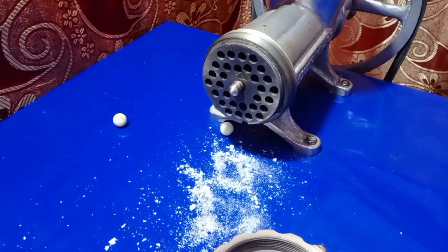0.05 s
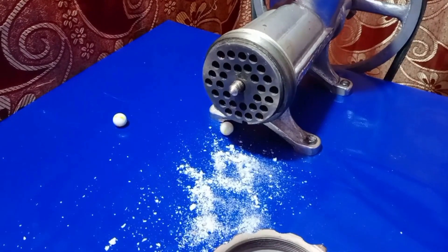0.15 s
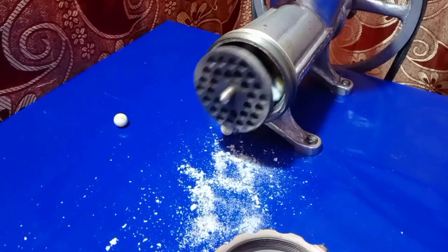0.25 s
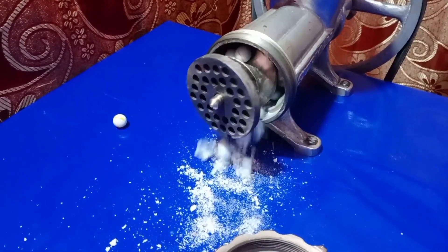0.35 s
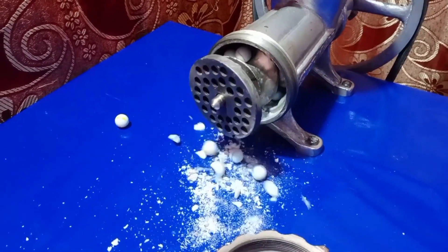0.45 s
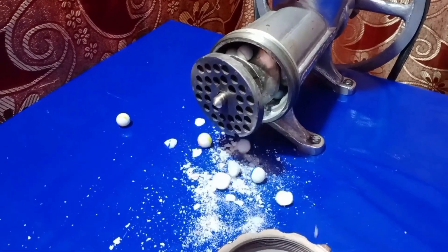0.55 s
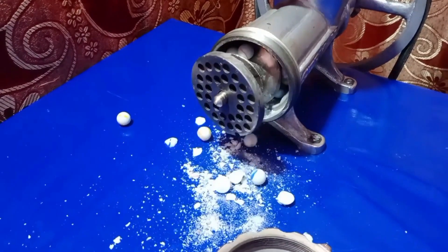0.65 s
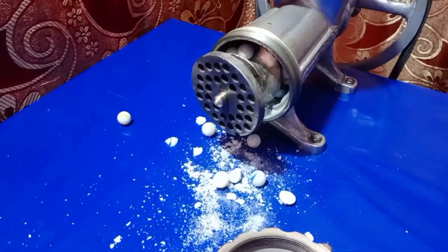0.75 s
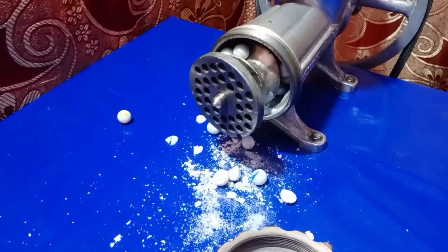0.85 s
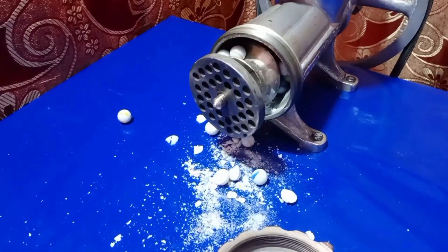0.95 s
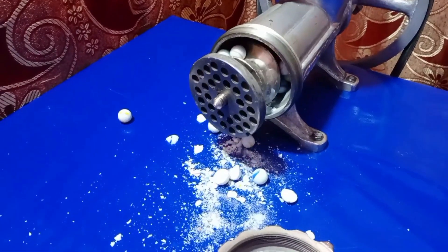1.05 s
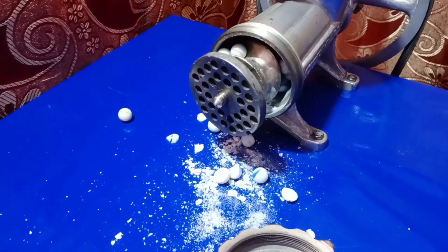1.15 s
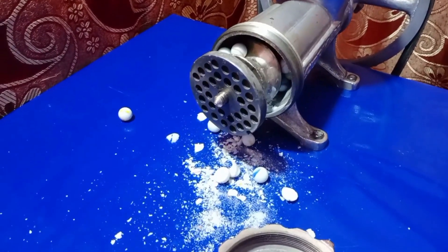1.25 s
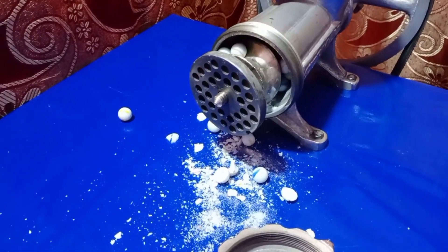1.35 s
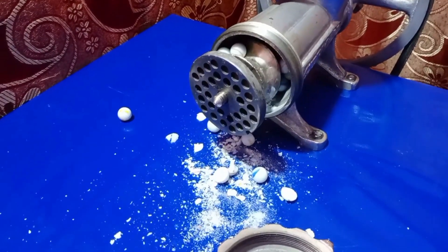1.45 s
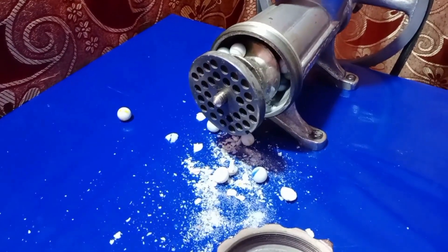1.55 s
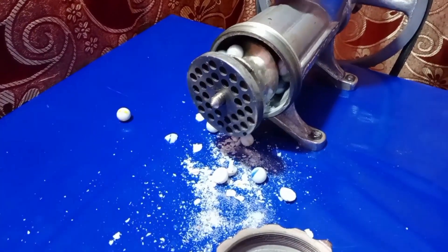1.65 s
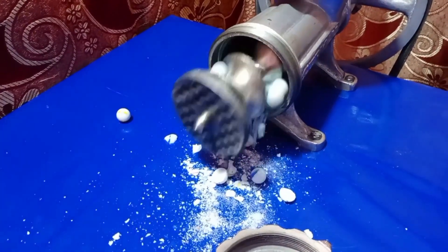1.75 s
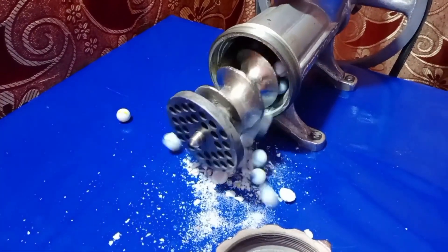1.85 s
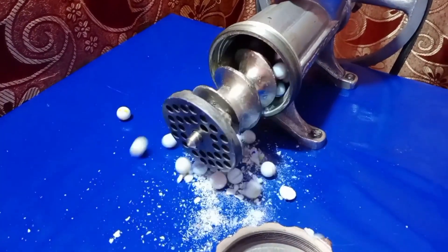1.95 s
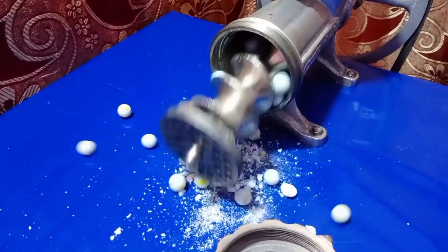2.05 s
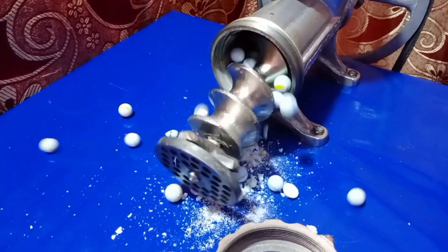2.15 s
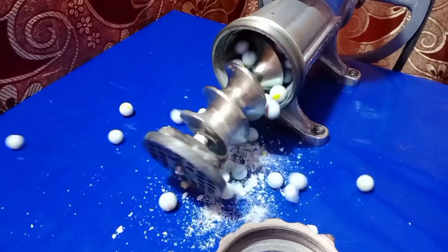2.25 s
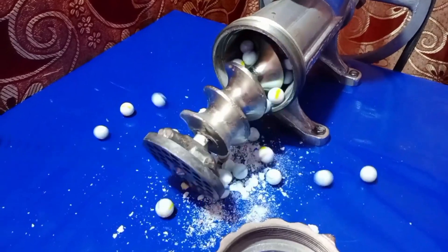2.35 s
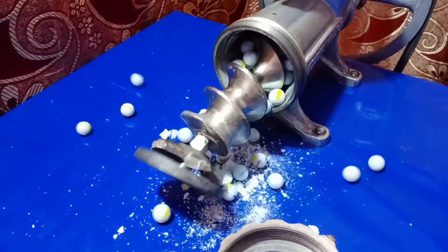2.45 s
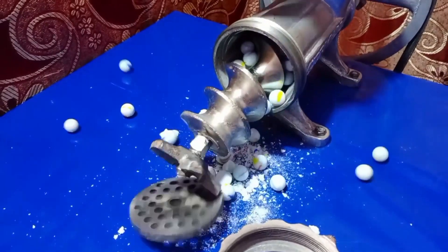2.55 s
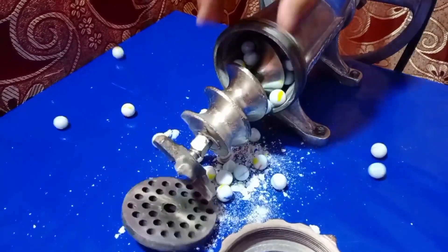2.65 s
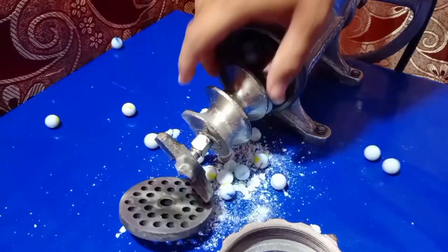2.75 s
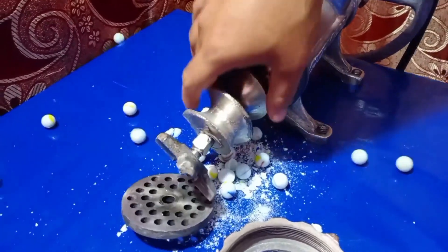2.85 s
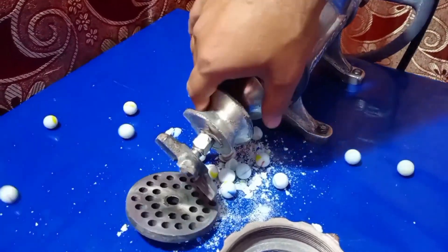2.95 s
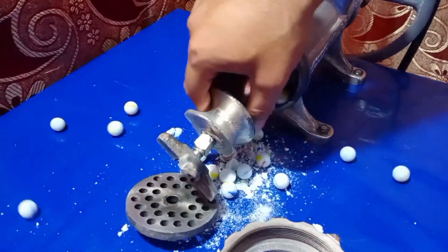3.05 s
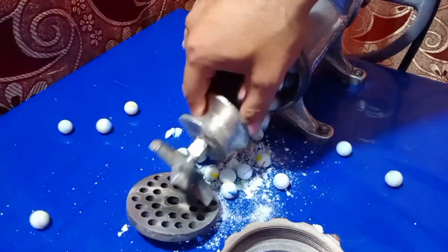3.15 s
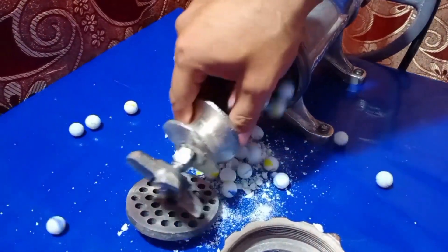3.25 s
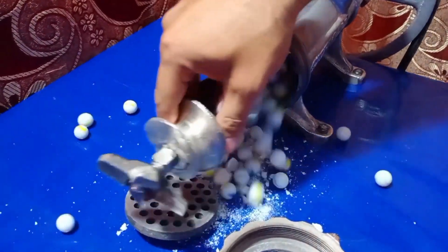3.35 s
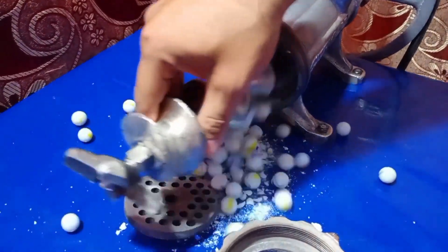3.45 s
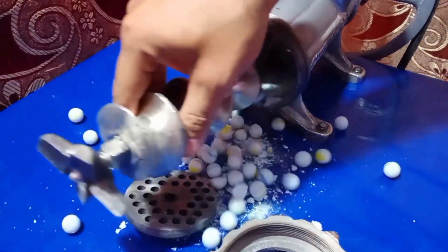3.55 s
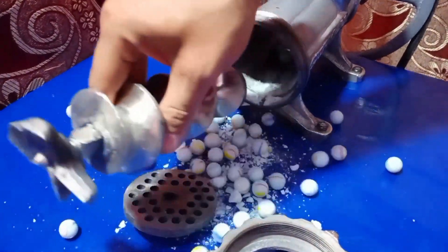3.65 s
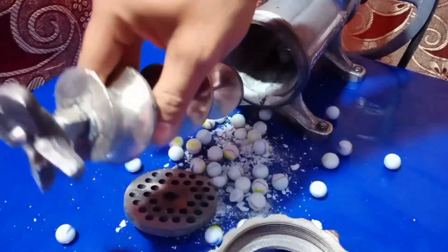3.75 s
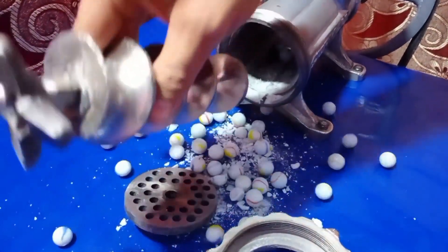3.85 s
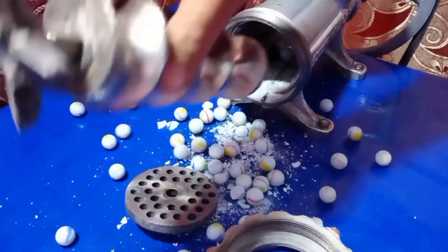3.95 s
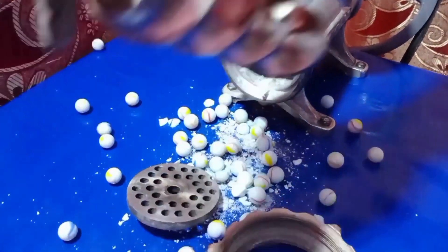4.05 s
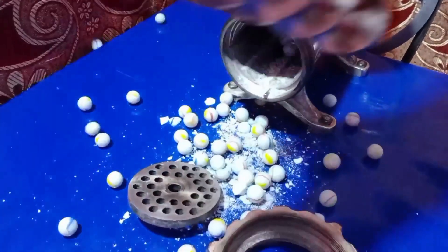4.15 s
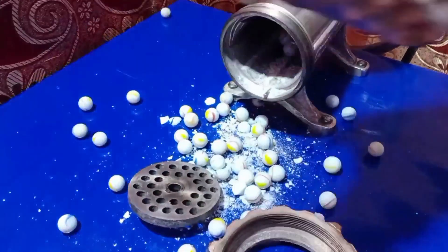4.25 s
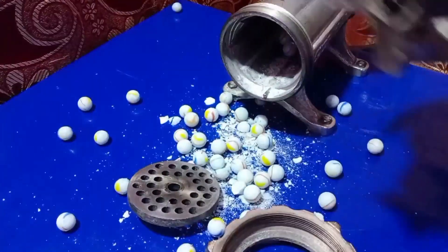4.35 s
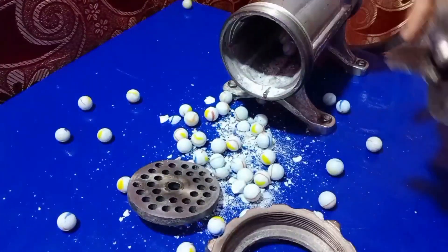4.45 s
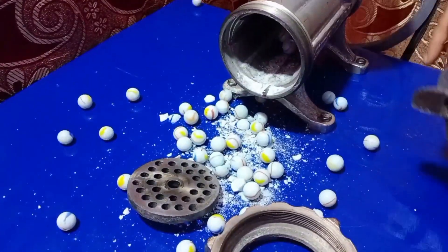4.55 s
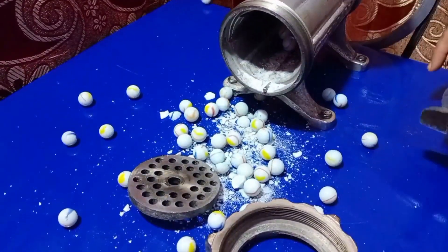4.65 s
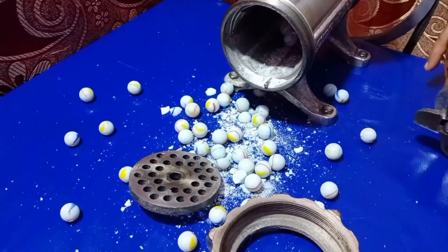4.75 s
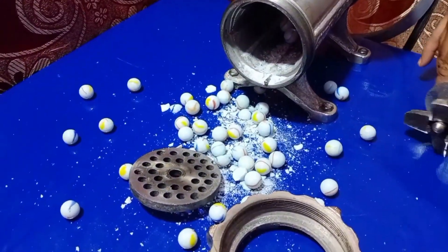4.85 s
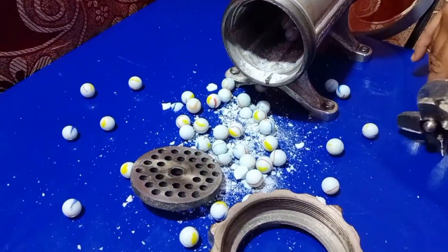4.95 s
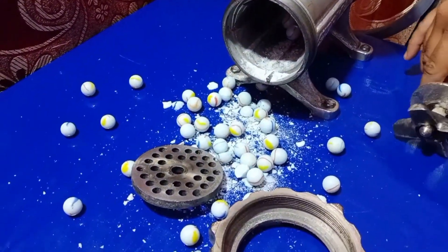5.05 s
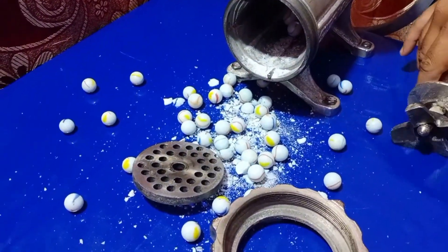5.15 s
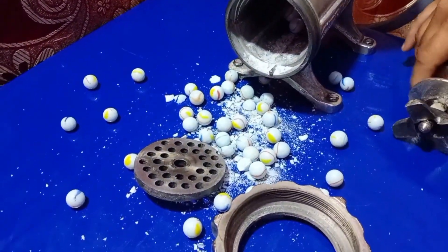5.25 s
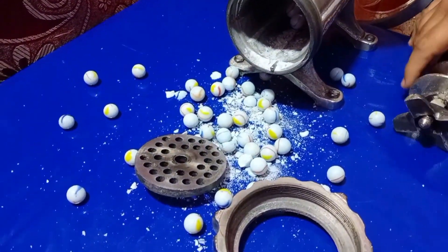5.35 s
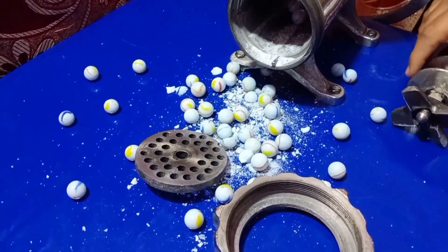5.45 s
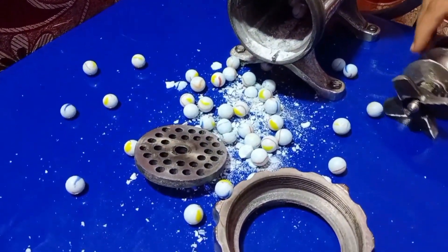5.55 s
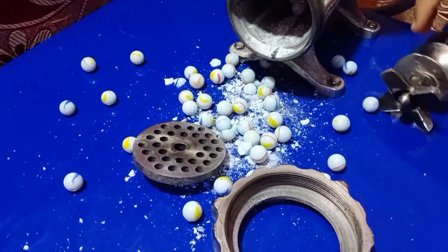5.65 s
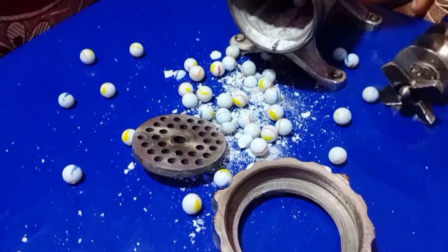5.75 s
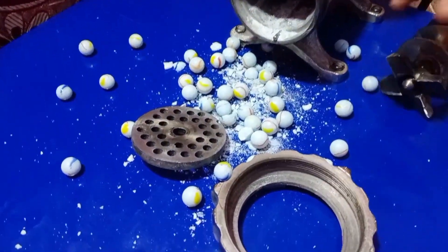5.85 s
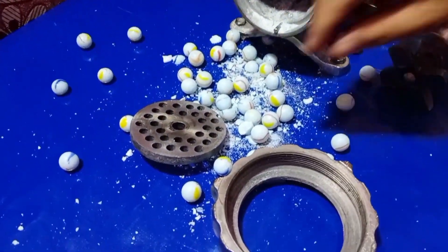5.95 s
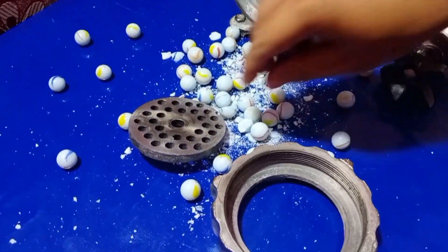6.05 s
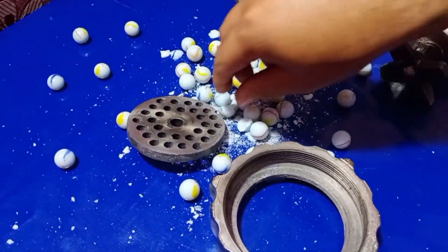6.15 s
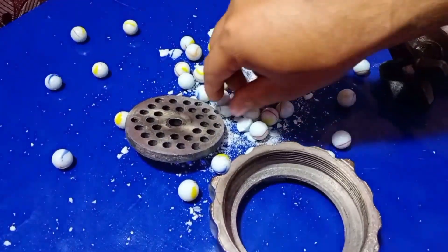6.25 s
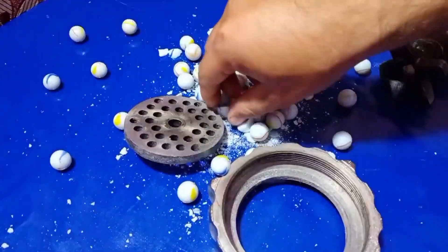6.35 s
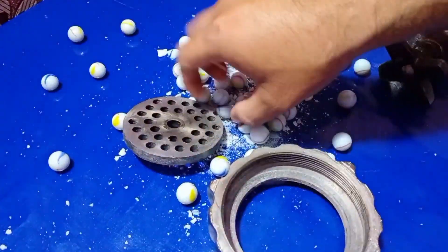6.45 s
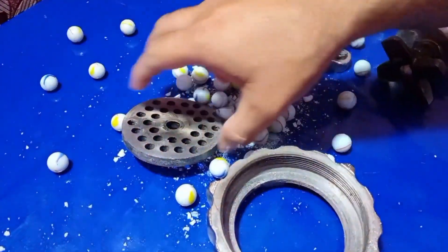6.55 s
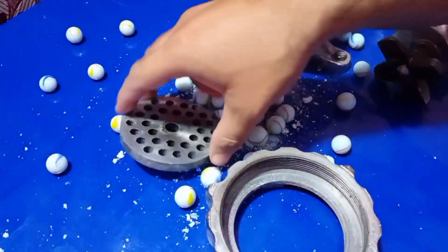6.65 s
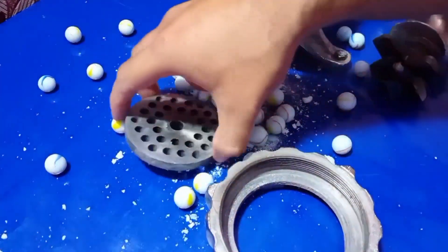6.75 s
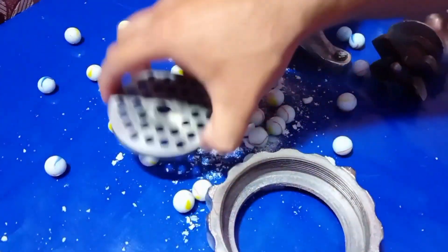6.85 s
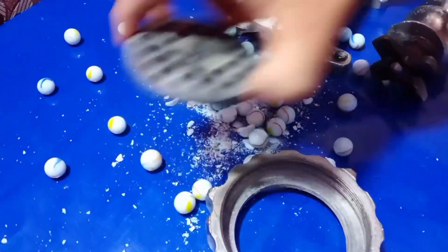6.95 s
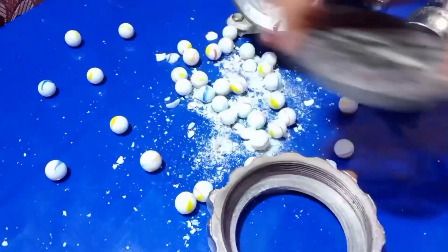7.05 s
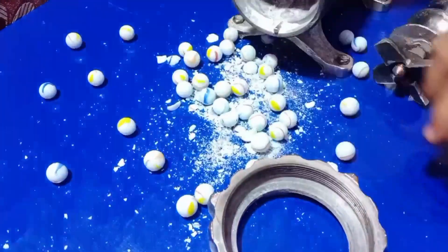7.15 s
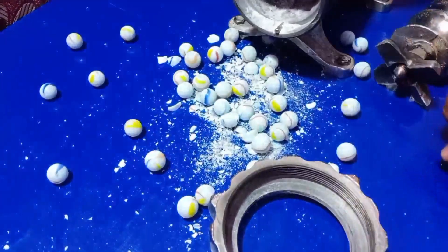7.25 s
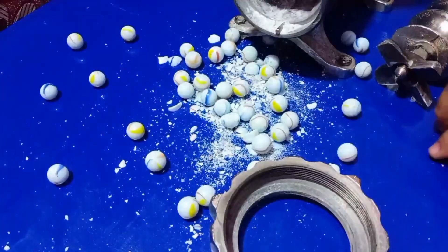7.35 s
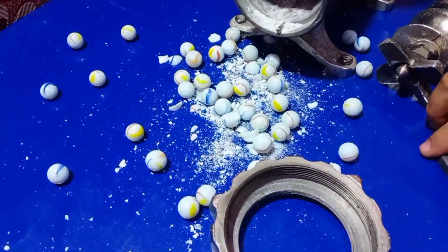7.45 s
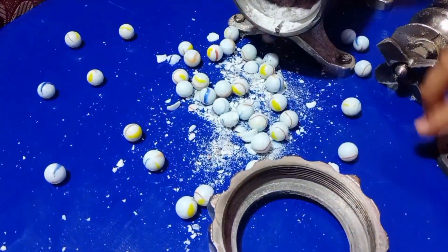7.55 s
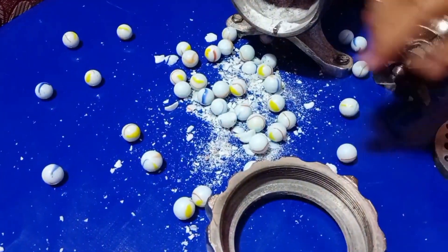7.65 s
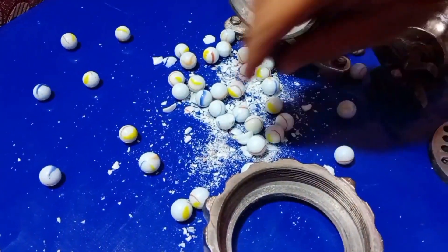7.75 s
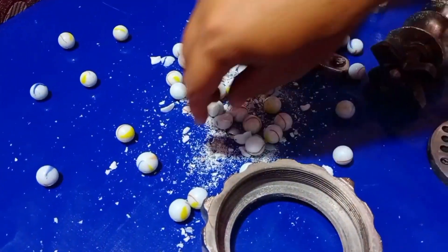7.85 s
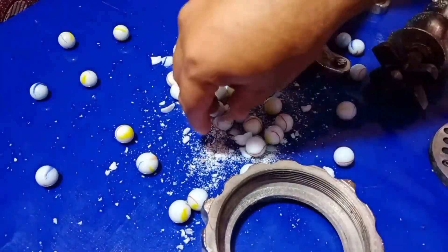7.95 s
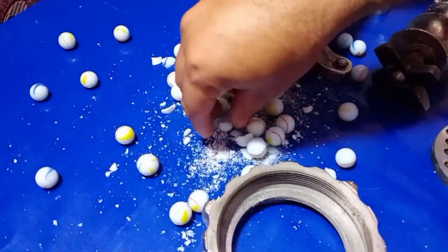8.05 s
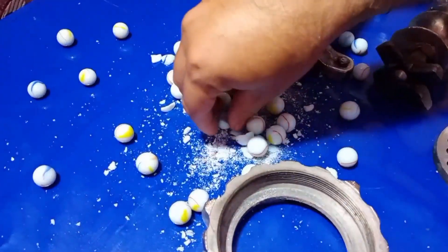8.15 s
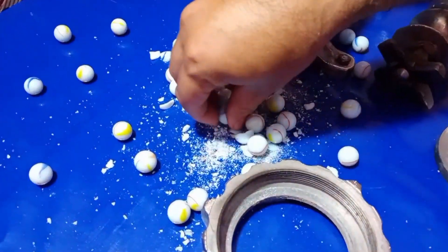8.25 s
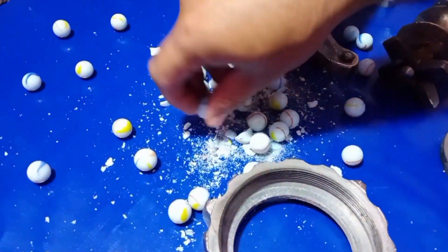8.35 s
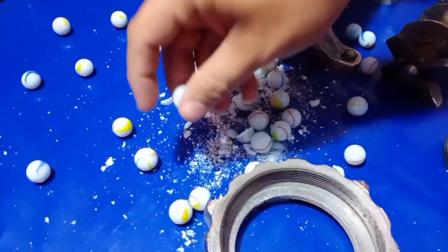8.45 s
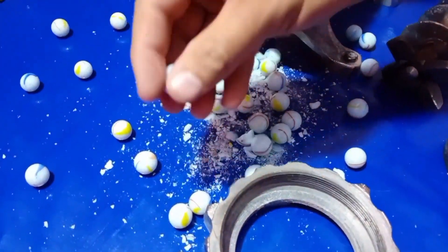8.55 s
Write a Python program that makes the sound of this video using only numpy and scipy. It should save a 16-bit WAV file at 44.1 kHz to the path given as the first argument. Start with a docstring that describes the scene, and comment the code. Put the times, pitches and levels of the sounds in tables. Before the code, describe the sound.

In a bare, echoing room, close up, two faint ticks open. From 0.35 s marbles knock out of a steel grinder onto a thin table, with sharp clacks and a thin high plate ring near 0.45 s, then scattered bounces until 1.4 s. After a short lull, a dense, loud spill runs from 1.8 to 2.8 s: glass clacks, board knocks, bright ticks, ringing steel plate and knife. It thins briefly around 3 s, then clatters again from 3.25 to 3.9 s. Isolated hard marble bounces ring out at about 3.9, 4.5, 4.65 and 5.1 s, with a low thud at 5 s as a part is set down. Small rattles and soft table bumps fade by 6.2 s. Faint rolling and a gently scraped plate follow around 6.8 s, dull set-down thuds at 7.6 and 7.7 s, then tiny clicks of fingers in marbles from 8.15 s to the end.

```python
"""Bare, echoing room: glass marbles and the steel parts of a hand grinder spill onto a thin table top.
Each contact is a short burst: board thump and knock, a clack of glass on metal, a bright tick, a brief clink.
Struck loose steel plate and knife ring on as decaying sines; bouts of random contacts make the rattle.
Later parts are set down with thuds and low hums, marbles roll in narrow board modes, fingers stir the heap.
Noise suppression patches the faint floor and ends tails early; a limiter holds the peaks down."""
import sys
import numpy as np
from scipy import signal
from scipy.fft import rfft, irfft
from scipy.io import wavfile
from scipy.ndimage import uniform_filter1d, minimum_filter1d

SR = 44100
rng = np.random.default_rng(int(sys.argv[2]) if len(sys.argv) > 2 else 0)


def master(y):
    """Save y as 16-bit WAV."""
    cut = np.clip(np.atleast_2d(y).T, -1, 1)
    pcm = np.round(cut * 32767)  # scale
    wavfile.write(sys.argv[1], SR, pcm.astype(np.int16))


N = 379250

# Single contacts. Each row: start in seconds, clack in dB, board in dB re clack, pitch of the struck
# board spot in Hz, tick in dB re clack, clink pitch in Hz, distance in hand spans.
HITS = [(0.063, -44, -29, 1420, -3, 2150, 1.9), (0.099, -37.5, -18.5, 1530, -12, 2710, 3.1),
        (0.332, -42.5, -8, 790, -12.5, 2800, 5.6), (.343, -27, -6.5, 783, -17, 2235, 8.8),
        (.361, -20, -15, 377, -13, 2390, 13), (0.382, -10.5, -9.5, 343, -11.5, 3130, 8.1),
        (.413, -13, -15, 1497, -7, 3100, 6.3), (.518, -25.5, -4, 1030, -21.5, 2600, 2),
        (.547, -23.5, -2.5, 1030, -19, 1790, 2.6), (.613, -25.5, -5.5, 983, -16, 4600, 2.2),
        (.653, -22, -8, 1030, -32, 1996, 3.4), (0.697, -17, -34, 1030, -10, 3160, 5),
        (0.715, -32, -26.5, 1360, -10, 2590, 2.5), (.848, -23.5, -14.5, 374, -14, 3140, 4.6),
        (.888, -30, -14, 376, -26, 2600, 2.9), (.954, -24, -22.5, 1440, -29, 2460, 8.7),
        (.968, -20.5, -13, 384, -12.5, 3040, 7), (1.032, -28, -8, 432, -18, 2540, 8.9),
        (1.057, -19.5, -19.5, 364.3, -7.5, 2400, 3.6), (1.141, -32.5, -35, 380, -9, 3120, 2.8),
        (1.174, -21.5, -24.5, 1370, -6, 2990, 3.5), (1.324, -24.5, -26.5, 1390, -8.5, 2460, 5.6),
        (1.395, -23, -25, 380, -7, 2430, 1.8), (1.765, -43, -16, 706, -14, 2420, 5.1),
        (1.798, -23.5, -10, 450, -15, 2330, 6.5), (1.82, -15, -16, 353, -10.5, 3150, 5.9),
        (1.854, -19, -13.5, 378, -23, 2564, 3.0), (1.874, -16, -10.5, 357, -12, 3100, 7.2),
        (1.931, -13, -15.5, 1440, -27.5, 2330, 2.4), (1.963, -18, -12.5, 1377, -5.5, 3120, 5),
        (1.998, -14.5, -11.5, 1485, -23, 3170, 2.3), (2.112, -26.5, -19, 1500, -14, 2510, 0.96),
        (2.138, -17, -20.5, 417, -10, 2360, 5.8), (2.218, -15, -13.5, 1330, -14.5, 2570, 4.3),
        (2.238, -17, -6.5, 1420, -26, 2490, 1.9), (2.28, -15, -8, 383, -30, 2207, 1.7),
        (2.306, -9.5, -26.5, 407, -20, 2190, 3.2), (2.321, -11.5, -15, 1488, -11, 2330, 2.9),
        (2.355, -15, -17.5, 1420, -12, 2750, 1.3), (2.386, -13.5, -14.5, 1490, -16, 3150, 7.3),
        (2.407, -30, -22.5, 1054, -13, 2414, 2.3), (2.441, -7, -14.5, 1030, -16, 2700, 3.1),
        (2.487, -11, -12, 1030, -17.5, 3170, 1.7), (2.521, -16, -7, 1330, -28.5, 2790, 3.4),
        (2.601, -13.5, -21.5, 1030, -35, 2250, 1.26), (2.68, -23.5, 3.5, 438, -11, 1680, 3.2),
        (2.712, -15.5, -11.5, 428, -3.5, 4430, 0.64), (2.724, -14, -23.5, 1030, -10.5, 4400, 1.5),
        (2.74, -20, 0, 1030, -3.5, 2930, 4.8), (2.769, -21, -1, 1307, -4, 2920, 7),
        (3.062, -29, -12, 1568, -6.5, 4780, 2.5), (3.251, -23, -12, 457, -17.5, 2350, 4.2),
        (3.276, -17, -12, 1480, -8.5, 2550, 6.8), (3.292, -11.5, -21.5, 570, -7, 3196, 5),
        (3.346, -16, -7.5, 1030, -10, 1724, 3.3), (3.389, -12, -7, 1480, -21, 2330, 2.7),
        (3.408, -9.5, -29.5, 1330, -5.5, 2920, 7.8), (3.482, -22.5, -7.5, 1090, -13, 2600, 1.1),
        (3.497, -13, -12, 1480, -8, 3100, 1.4), (3.504, -16, -20, 1480, -10, 2670, 1.5),
        (3.541, -16, -10, 1030, -17, 2590, 4.3), (3.577, -16, -12.5, 1030, -12.5, 2330, 6.9),
        (3.62, -19, -12, 1030, -22.5, 2370, 2.5), (3.658, -20.5, -8, 1160, -6, 1750, 2.8),
        (3.725, -23, -13, 1510, -26.5, 2950, 0.57), (3.763, -30.5, -13.5, 1430, -19, 2060, 1.1),
        (3.799, -29.5, 1.5, 1107, -4, 2350, 2.8), (3.817, -26, -0.5, 1030, -21, 2330, 2.6),
        (3.889, -34.5, -17, 1490, -18, 2900, 2.5), (3.93, -3.7, -29, 1455, -4, 2750, 2.75),
        (4.181, -32, -17, 1380, 1, 2874, 7.2), (4.388, -38, -26, 1500, -22, 2420, 4.5),
        (4.401, -29, -23, 1400, 1, 2770, 5.1), (4.493, -7.5, -39.5, 1450, -9, 2646, 4.44),
        (4.542, -26, -45.5, 1500, -22, 2720, 2.5), (4.58, -22.5, -31, 1500, -1.5, 2530, 2.7),
        (4.656, -8, -44, 1430, -10.5, 2556, 4.4), (4.742, -23.5, -42.5, 1470, -14, 2600, 4.6),
        (4.881, -34.5, -19.5, 1430, -3.5, 1820, 3.3), (4.898, -64.5, 15.5, 257, -33, 2390, 4.2),
        (4.999, -36, 8, 577, -24.5, 2040, 2.7), (5.069, -3, -20, 1545, -18.5, 2570, 13),
        (5.21, -15.5, -11, 1033, -47, 2400, 7.3), (5.281, -23, -11, 1226, -21, 2430, 2.1),
        (5.299, -21, -27.5, 1030, 1.5, 2590, 7.2), (5.437, -25.5, -6, 1114, -30, 2510, 4),
        (5.711, -16, -36, 1470, -7, 2456, 7.6), (5.831, -34.5, -8.5, 370, -18, 2080, 2.8),
        (5.907, -53, -4.5, 900, -23, 2100, 2.1), (6.014, -70.5, 17, 570, -40, 2168, 1.3),
        (6.106, -26, -43, 1510, -10.5, 3220, 5.7), (6.163, -32, -46.5, 1495, -9, 2770, 10.7),
        (6.357, -49, -34.5, 1500, -17, 2700, 3.0), (6.394, -49.5, -23, 1500, -19.5, 2520, 3),
        (6.517, -39.5, -27.5, 755, -10, 2690, 5), (6.743, -60, -3, 790, 8, 3650, 4.3),
        (6.776, -49.5, -0.5, 690, -16.5, 2060, 5), (6.811, -50.5, -3, 1340, -19, 2050, 1),
        (6.87, -62, 11, 807, -26, 2120, 11), (6.891, -41, -5.5, 1350, -2, 2090, 5.3),
        (6.97, -54.5, -0.5, 1020, -10.5, 2200, 1.6), (7.12, -66.5, -25, 1400, 4.5, 3300, 2.5),
        (7.306, -40, -36, 1353, -25.5, 3180, 1.9), (7.546, -46.5, -28, 1430, -21.5, 4030, 5.9),
        (7.566, -45, 9.5, 588, -41.5, 2090, 2.4), (7.655, -47, -20, 466, -7, 3840, 7.4),
        (7.67, -46.5, -14, 474, -11, 3700, 5.8), (7.689, -39, 10, 598, -33, 1995, 1.36),
        (8.17, -60.5, 9.5, 1123, -9, 2270, 3.0), (8.191, -46, -11, 683, 1, 2260, 3),
        (8.231, -51, -13.5, 680, 1.5, 2620, 8.6), (8.266, -45, -4, 1115, -15, 2170, 3.5),
        (8.299, -48.5, -16.5, 1410, -10.5, 2100, 1), (8.421, -38.5, -18, 1500, -5.5, 2260, 3.1),
        (8.587, -67, 7.5, 654, -21, 1880, 3.3)]
# Bouts of many small contacts. Each row: start and end in seconds, boom in dB re thump, tick in dB re clack,
# then clack, knock and thump, each in dB at the start and at the end.
RATTLE_BOUTS = [(0.0, 0.143, -2.5, -23.5, -41.5, -75, -55, -80, -90.5, -82),
                (0.499, 0.837, -16.5, -5, -36.5, -48.5, -25, -68, -31.5, -66.5),
                (0.831, 1.155, 0.5, -4, -57, -58, -53, -72.5, -50, -55),
                (1.86, 2.665, -10, -11, -30, -37.5, -38, -39.5, -36.5, -44),
                (2.69, 2.972, -5.5, -5, -46, -58.5, -32, -64.5, -26, -53.5),
                (2.9, 3.263, 9.5, -8.5, -70, -59.5, -59.5, -75, -51.5, -74.5),
                (3.353, 3.924, -0.5, -14.5, -24, -47, -28, -53, -42, -55),
                (4.53, 4.858, -6.5, -8, -77, -45.5, -78, -74, -92, -77.5),
                (4.849, 4.99, 9, -10.5, -43, -58, -73.5, -67, -76, -69),
                (5.08, 5.405, 0.5, -16, -39, -46.5, -35.5, -54.5, -52, -68),
                (5.437, 5.713, -2.5, -16, -64, -57.5, -76.5, -78, -80.5, -73),
                (5.778, 6.101, 9, -18, -59.5, -76, -71, -98, -61, -75),
                (6.309, 6.622, 1, -8, -66.5, -64, -87, -80, -88.5, -85.5),
                (6.719, 7.251, 8.5, -7, -60.5, -84, -79, -89.5, -61, -87),
                (8.248, 8.378, 0, -21.5, -67, -72, -66, -80, -92.5, -90)]
# Modes of the loose steel parts. Each row: frequency in Hz, free t60 in seconds, family index, dB in the family.
PLATE_MODES = [(5292, .9, 0, 0), (5347, 1, 1, 0), (6599, .3, 2, 0), (8590, .4, 2, -12), (11330, .7, 3, -7),
               (12022, .8, 3, 0)]
KNIFE_MODES = [(6148, .79, 0, 0), (13770, .15, 1, 0), (6420, .4, 2, 0)]
# Blows on them. Each row: start in seconds, ratio to the free ringing time, dB of each family in turn.
PLATE_BLOWS = [(.431, 0.75, -34.5, -32.5, -34.5, -79), (0.489, 1.52, -50.5, -25.5, -54, -48),
               (2.258, 1.3, -46, -32.5, -53, -56), (2.284, 0.85, -43, -42, -32.5, -56.5),
               (2.38, 1.2, -30, -44.5, -37, -57), (2.489, .87, -36, -45.5, -57, -77.5),
               (2.644, 0.61, -31.5, -42.5, -32, -57.5), (2.734, 0.75, -30.5, -33.5, -69.5, -48.5),
               (3.064, 0.31, -50, -54.5, -64, -74), (3.663, 0.41, -51.5, -41.5, -60, -45.5),
               (6.9, 0.22, -55, -62, -70, -93)]
KNIFE_BLOWS = [(2.111, 0.51, -33.5, -30, -73), (2.22, .99, -58.5, -50, -72), (3.59, 0.46, -41, -44, -54),
               (3.69, 0.46, -56, -33.5, -38.5)]
# Touches that weaken a ringing part. Each row: start in seconds, gain in dB.
PLATE_TOUCHES = [(1.055, -8), (2.959, -10.5)]
KNIFE_TOUCHES = [(2.2, -12.5), (3.685, -7.5), (3.78, -8.5)]
# Reverberation. Each row: frequency in Hz, t60 in seconds.
ROOM_T60 = [(150, 0.11), (700, 0.42), (2200, 0.32), (5500, 0.31), (13000, 0.21)]
# Floor spectrum after the microphone, then microphone response. Each row: frequency in Hz, level in dB.
FLOOR_SPECTRUM = [(18, -37.5), (30, 1), (296, -5.5), (364, -19.5), (754, -24.5), (2250, -15.5),
                  (3410, -36.5), (6040, -30.5), (7430, -40), (15000, -38.5)]
MIC_RESPONSE = [(30, -36.5), (52, -23), (62, -7.5), (80, -11), (3500, 5), (5000, 9.5), (7000, -0.5),
                (8800, -13.5), (10200, -17), (12000, -11), (14000, -5), (15500, -6.5)]
# Modes of the board, of the barrel and of loose parts. Each row: frequency in Hz, width in Hz, level in dB.
BOARD_BOOM = [(72.1, 5.8, -2.5), (121, 3.8, -12.5), (151.7, 11, -4), (245.4, 10, 1)]
BOARD_THUMP = [(317.6, 45, -9.5), (398.7, 42.4, 1.5), (498.6, 44, -0.5), (536, 55, -1), (689.4, 23.3, -8)]
BOARD_KNOCK = [(792, 182, 5), (1030, 110, 3), (1235, 150, 1), (1330, 83, 3.5), (1480, 300, 7.5),
               (2000, 310, -10)]
BARREL = [(1790, 1300, 5.5), (2330, 360, 5.5), (2570, 55, -6), (2625, 120, -5.5), (3170, 257, -2)]
LOOSE_PARTS = [(1740, 910, -1.5), (2350, 460, 1.5), (2620, 390, 0.5), (3300, 1980, 3)]
# Phases: first marbles drop out, stragglers bounce, screw slides out, plate falls flat, marbles land on the
# heap, screw is set down, marbles drop off the edge, plate is lifted and set aside, fingers in the heap.
# Each row: start in seconds, then dB added to thump, boom and sparkle of each single contact.
PHASES = [(0.0, -3.5, -3.5, -1), (.9, -1, -3.5, -4), (1.7, -4.5, 0, 0), (2.6, -1, -3, 0),
          (3.4, -11, -12.5, 2), (4.8, -1.5, 0.5, -5.5), (5.05, -14.5, -8.5, 0), (5.8, 0.5, 0, 1.5),
          (8.1, -19, -3.5, 5)]
# Single marbles rolling over the board. Each row: start and end in seconds, level in dB.
ROLLS = [(3.49, 3.88, -38), (5.5, 5.7, -94), (6.406, 6.7, -69.5), (6.752, 7.24, -76.5),
         (8.145, 8.56, -77.5)]
# Narrow board modes a rolling marble keeps sounding. Each row: frequency in Hz, width in Hz, level in dB.
ROLL_MODES = [(680.4, 7, 0.5), (785, 22, -4), (1560, 15, -5), (2430, 60, -7.5), (2980, 52, -8.5),
              (3650, 56, -15.5)]
# The hand leans on the table. Each row: start in seconds, level in dB.
LEANS = [(4.97, -42), (5.26, -50), (5.842, -42.5), (5.929, -44.5), (6.82, -52.5), (6.922, -52),
         (7.57, -51.5), (7.69, -43.5)]
# A heavy part is set down. Each row: start in seconds, level in dB.
THUDS = [(4.998, -38.5), (7.567, -38.5), (7.688, -34.5)]
# Modes of the heavy part that is set down. Each row: frequency in Hz, level in dB, t60 in seconds.
SET_DOWN_PART = [(254, -12, 0.21), (362, -7.5, 0.19), (447, 0, 0.15), (572, 0.2, 0.088), (702, -8.5, .15),
                 (852, 4.5, .1), (1012, -8.5, 0.18), (1330, -11, .1), (1500, -11.5, .12),
                 (2020, -21.5, 0.076), (2207, -15, .1), (2600, -17, 0.092)]

RATTLE_PER_S, RATTLE_SPREAD_DB, RATTLE_RISE_S = 380, 8, 0.055
BURST_STEPS = 512
TICK_HZ, SPARKLE_HZ, BURST_MS = 3600, 9000, 2.98
SPARKLE_RE_TICK_DB, RATTLE_SPARKLE_RE_TICK_DB = -19, -18.5
CHATTER_MS, CHATTER_SHARE = 4.6, 0.98
ROOM_RADIUS_SPANS = 2.1  # echo and direct sound are equal here
CHATTER_GROWTH = 0.51  # smear exponent over distance / room radius
# A spot pitched above the even point knocks more than it thumps.
EVEN_SPOT_HZ, KNOCK_DB_PER_OCTAVE, MOST_TILT_DB, BOOM_UNDER_THUMP_DB = 512, 3.5, 9, 8
CLINK_RE_CLACK_DB, LONGEST_CLINK_T60_S = -9.5, 0.056
SPOT_RE_BOARD_DB, SPOT_T60_S = 0.5, 0.081
BARREL_EMPTY_S = 3.9
ROLL_FADE_S = 0.04
LEAN_HZ, LEAN_T60_S, LEAN_RISE_S = 72, 0.7, 0.016
ROOM_DB, RATTLE_ECHO_DB, BUILD_UP_S = -1, -1, 0.0032
FLOOR_RMS_DB = -45  # ahead of the microphone
SUPPRESS_OVER_DB, SUPPRESS_DEPTH_DB = 3, -10
LIMIT_DB, EXCESS_FALL_DB_PER_S, LOOK_AHEAD_MS = -15, 73, 6
RUMBLE_CUT_HZ, TOP_CUT_HZ = 46, 16100


def from_db(db):
    """dB to gain."""
    return 10 ** (np.asarray(db) / 20)


def rms_one(x):
    """Scale to rms 1."""
    return x / np.sqrt(np.mean(x ** 2) + 1e-20)


def at_hz(points, hz):
    """Read a (Hz, value) table on a log frequency axis."""
    points_hz, values = np.array(points).T
    return np.interp(np.log(hz + 1), np.log(points_hz), values)


def floor():
    """Faint steady noise of room and recorder, shaped so the microphone colour leaves the floor spectrum."""
    hz = np.arange(N // 2 + 1) * SR / N
    shape = from_db(at_hz(FLOOR_SPECTRUM, hz) - at_hz(MIC_RESPONSE, hz))
    noise = irfft(rfft(rng.standard_normal(N)) * shape, N)
    return from_db(FLOOR_RMS_DB) * rms_one(noise)


def rattle_levels():
    """Each bout swells quickly, slides from first to last levels and stops; dB of the six trains."""
    t, levels = np.arange(N) / SR, np.full((6, N), -200.)
    for start, end, boom, tick, *pairs in RATTLE_BOUTS:
        inside = (t >= start) & (t < end)
        bout_t = t[inside]
        swell = 20 * np.log10(np.clip((bout_t - start) / RATTLE_RISE_S, .03, 1))
        slides = [swell + np.interp(bout_t, [start, end], pair) for pair in np.reshape(pairs, (3, 2))]
        clack, knock, thump = slides
        ticks = clack + tick
        bout = [clack, thump + boom, thump, knock, ticks, ticks + RATTLE_SPARKLE_RE_TICK_DB]
        levels[:, inside] = np.maximum(levels[:, inside], bout)
    return levels


def rattle():
    """Random small contacts, uneven in size, each a brief burst that strikes every body in its own way."""
    born = rng.random(N) < RATTLE_PER_S / SR
    sizes = born * from_db(RATTLE_SPREAD_DB * np.minimum(rng.exponential(1, N), 3.5))
    force = signal.lfilter([1], [1, -np.exp(-1000 / (BURST_MS * SR))], sizes)
    trains = rms_one(force) * rng.standard_normal((6, N)) * from_db(rattle_levels())
    return trains * from_db([[-13.0], [-28.0], [-23.0], [-18.0], [-15.0], [-15.0]])


def burst(count, ms):
    """Rows of noise dying with time constant ms, energy 1 each."""
    decay = np.exp(-np.arange(BURST_STEPS) / (ms * SR / 1000))
    rows = rng.standard_normal((count, BURST_STEPS)) * decay
    return rows / np.sqrt(np.sum(rows ** 2, axis=1, keepdims=True))


def echo_over_direct_db(distance_spans):
    """Direct sound falls off with distance, echo does not."""
    return 20 * np.log10(distance_spans / ROOM_RADIUS_SPANS)


def layer_levels(table):
    """dB of clack, boom, thump, knock, tick and sparkle per contact; spot pitch tilts thump against knock."""
    s, clack, board, spot_hz, tick = table.T[:5]
    starts, *added = np.transpose(PHASES)
    phase = np.maximum(np.searchsorted(starts, s) - 1, 0)
    more_thump, more_boom, more_sparkle = np.array(added)[:, phase]
    tilt = KNOCK_DB_PER_OCTAVE * np.log2(spot_hz / EVEN_SPOT_HZ)
    tilt = np.clip(tilt, -MOST_TILT_DB, MOST_TILT_DB)
    thump = board - np.maximum(tilt, 0)
    knock = board + np.minimum(tilt, 0)
    boom = thump - BOOM_UNDER_THUMP_DB + more_boom
    sparkle = SPARKLE_RE_TICK_DB + tick + more_sparkle
    return clack + np.array([0 * clack, boom, thump + more_thump, knock, tick, sparkle])


def hits():
    """Each contact pushes the board, chatters and ticks, more smeared when far; direct and room feeds."""
    table, steps = np.array(HITS), np.arange(BURST_STEPS)
    distance = table[:, 6]
    push = steps == 0
    smear = (distance[:, None] / ROOM_RADIUS_SPANS) ** CHATTER_GROWTH
    ticks = burst(len(table), smear * BURST_MS)
    chatter = np.sqrt(CHATTER_SHARE) * burst(len(table), smear * CHATTER_MS)
    chatter = chatter + np.sqrt(1 - CHATTER_SHARE) * push
    at = np.minimum(np.round(table[:, :1] * SR).astype(int) + steps, N - 1)
    levels = layer_levels(table).T
    split = echo_over_direct_db(distance) / 2
    direct, to_room = np.zeros((2, 6, N))
    for k, force in enumerate([chatter, push, push, push, ticks, ticks]):
        np.add.at(direct[k], at, force * from_db(levels[:, k] - split)[:, None])
        to_room[k, at[:, 0]] = from_db(levels[:, k] + split)  # the room gets plain clicks
    return direct, to_room


def ring(clicks, hz, t60_s):
    """Two-pole resonator: a unit click sets a damped sine of height 1 ringing."""
    r, w = from_db(-60 / (t60_s * SR)), 2 * np.pi * hz / SR
    return signal.lfilter([0, np.sin(w)], [1, -2 * r * np.cos(w), r * r], clicks + 1e-18)


def body(clicks, modes):
    """Parallel damped modes with alternating signs; little sounds outside their range."""
    rings = 0
    for k, (hz, width_hz, db) in enumerate(modes):
        t60_s = np.log(1000) / (np.pi * width_hz)
        rings = rings + (-1) ** k * from_db(db) * ring(clicks, hz, t60_s)
    edges_hz = [0.89 * modes[0][0], 1.433 * modes[-1][0]]
    return signal.sosfilt(signal.butter(2, edges_hz, "band", fs=SR, output="sos"), rings)


def contacts(trains):
    """Six trains excite their bodies; the clack loses the barrel's ring once the screw is out."""
    clack, boom, thump, knock, tick, sparkle = trains
    inside = np.arange(N) < BARREL_EMPTY_S * SR
    glass = signal.butter(3, [TICK_HZ, SPARKLE_HZ], "band", fs=SR, output="sos")
    air = signal.butter(3, SPARKLE_HZ, "high", fs=SR, output="sos")
    clacks = from_db(-5.0) * body(clack * inside, BARREL)
    clacks = clacks + from_db(2.5) * body(clack * ~inside, LOOSE_PARTS)
    board = from_db(2.0) * body(thump, BOARD_THUMP) + from_db(-2.0) * body(knock, BOARD_KNOCK)
    ticks = from_db(18.0) * signal.sosfilt(glass, tick + 1e-18)
    sparkles = from_db(32.5) * signal.sosfilt(air, sparkle + 1e-18)
    return clacks + board + ticks + sparkles, from_db(3.0) * body(boom, BOARD_BOOM)


def clinks():
    """Each contact also rings briefly at its own pitches, in glass and in board; direct and room feeds."""
    out, t = np.zeros((2, N + 4096)), np.arange(4096) / SR
    for s, db, board, spot_hz, _, clink_hz, distance in HITS:
        t60_s = LONGEST_CLINK_T60_S * min((2500 / clink_hz) ** 2.5, 1)  # high clinks die much faster
        clink = from_db(CLINK_RE_CLACK_DB - 60 * t / t60_s) * np.sin(2 * np.pi * clink_hz * t)
        spot = from_db(SPOT_RE_BOARD_DB + board - 60 * t / SPOT_T60_S) * np.sin(2 * np.pi * spot_hz * t)
        at, split = round(s * SR), echo_over_direct_db(distance) / 2
        out[:, at:at + len(t)] += from_db(db + np.array([[-split], [split]])) * (clink + spot)
    return out[:, :N]


def steel(modes, blows, touches):
    """Each blow starts every mode family at its own strength and ringing time; later touches weaken it."""
    out, t = np.zeros(N), np.arange(2 * SR) / SR
    for s, share, *levels in blows:
        at = round(s * SR)
        sound = np.zeros(len(t))
        for hz, t60_s, family, db in modes:
            decay = from_db(levels[family] + db - 60 * t / (share * t60_s))
            sound += decay * np.sin(2 * np.pi * hz * t)
        touch_db = np.zeros(len(t))
        for touch, db in touches:
            if touch > s:
                touch_db += db * np.clip((s + t - touch) / .025, 0, 1)
        out[at:at + len(t)] += (sound * from_db(touch_db))[:N - at]
    return out


def rolling():
    """A rolling marble feeds the board's narrow modes with steady noise."""
    t, gain = np.arange(N) / SR, np.zeros(N)
    for start, end, db in ROLLS:
        gain += from_db(db) * np.clip(np.minimum(t - start, end - t) / ROLL_FADE_S, 0, 1)
    return gain * rms_one(body(rng.standard_normal(N), ROLL_MODES))


def leans():
    """A soft push sets the whole table swinging at its lowest mode."""
    t, out = np.arange(N) / SR, np.zeros(N)
    for s, db in LEANS:
        age = np.maximum(t - s, 0)
        swell = 1 - np.exp(-age / LEAN_RISE_S)
        out += from_db(db - 60 * age / LEAN_T60_S) * swell * np.sin(2 * np.pi * LEAN_HZ * age)
    return out


def thuds():
    """Each set-down strikes every mode of the heavy part with a strength of its own."""
    s, db = np.transpose(THUDS)
    spread_db, out = rng.normal(0, 2.1, (len(s), len(SET_DOWN_PART))), np.zeros(N)
    top_db = max(level for _, level, _ in SET_DOWN_PART)
    for k, (hz, level, t60_s) in enumerate(SET_DOWN_PART):
        clicks = np.zeros(N)
        clicks[(s * SR).astype(int)] = from_db(db + level - top_db + spread_db[:, k])
        out += ring(clicks, hz, t60_s)
    return out


def room(x):
    """Reflections build up, then die at their own rate in every half octave."""
    t, edges_hz = np.arange(SR // 2) / SR, 40 * 2 ** np.arange(0, 9, .5)
    white, tail = rng.standard_normal((2, len(t))), 0
    for k, (low, high) in enumerate(zip(edges_hz, edges_hz[1:])):
        band_filter = signal.butter(2, [low, high], "band", fs=SR, output="sos")
        band = signal.sosfilt(band_filter, white[k % 2])
        t60_s = at_hz(ROOM_T60, np.sqrt(low * high))
        decay_energy = t60_s * SR / (2 * np.log(1000))
        tail = tail + band * from_db(-60 * t / t60_s) / np.sqrt(decay_energy)
    build_up = 1 - np.exp(-(t / BUILD_UP_S) ** 2)
    return signal.fftconvolve(x, tail * build_up)[:N]


def microphone(x):
    """Minimum-phase microphone colour via the folded cepstrum: deep dip near 10 kHz, a peak above."""
    hz = np.arange(513) * SR / 1024
    cepstrum = irfft(at_hz(MIC_RESPONSE, hz) * np.log(10) / 20)
    cepstrum[1:512] *= 2
    cepstrum[513:] = 0
    return signal.fftconvolve(x, irfft(np.exp(rfft(cepstrum))))[:N]


def scene():
    """Mix direct and room sound; the steel rings join after the microphone colour."""
    direct, to_room = hits()
    thud, heap = thuds(), rattle()
    clink, far_clink = clinks()
    near, boom = contacts(direct + heap)
    far, far_boom = contacts(to_room + from_db(RATTLE_ECHO_DB) * heap)
    far_board = from_db(4.5) * far_boom + from_db(-8.5) * thud
    echo = from_db(ROOM_DB) * room(far + from_db(-5.5) * far_clink + far_board)
    rings = steel(PLATE_MODES, PLATE_BLOWS, PLATE_TOUCHES) + steel(KNIFE_MODES, KNIFE_BLOWS, KNIFE_TOUCHES)
    struck = near + from_db(3.0) * clink + boom + echo + thud
    return (microphone(struck + rolling() + leans() + floor()) + rings)[None]


def suppressor(x):
    """Bins near the steady noise level are turned down, so tails end early and the floor turns patchy."""
    _, _, bins = signal.stft(x, SR, nperseg=1024, noverlap=768)
    power = uniform_filter1d(np.abs(bins) ** 2, size=3, axis=1)
    noise = np.percentile(power, 8, axis=1, keepdims=True) * from_db(2 * SUPPRESS_OVER_DB)  # power: dB doubled
    gain = np.maximum(1 - noise / (power + 1e-20), from_db(SUPPRESS_DEPTH_DB))
    return signal.istft(bins * gain, SR, nperseg=1024, noverlap=768)[1][:N]


def limiter(x):
    """Gain drops just ahead of loud peaks by 0.8 of the excess, then climbs back at a steady rate."""
    ahead = int(LOOK_AHEAD_MS * SR / 1000)
    ramp = EXCESS_FALL_DB_PER_S * np.arange(N) / SR
    over_db = np.maximum(20 * np.log10(np.abs(x) + 1e-9) - LIMIT_DB, 0)
    held_db = np.maximum.accumulate(over_db + ramp) - ramp
    early_db = -minimum_filter1d(-held_db, 2 * ahead + 1)  # running maximum
    return x * from_db(-.8 * uniform_filter1d(early_db, ahead))


def record(dry):
    """Suppress noise, hold peaks down, cut rumble and top steeply."""
    held = limiter(suppressor(dry[0]))
    held = signal.sosfilt(signal.butter(4, RUMBLE_CUT_HZ, "high", fs=SR, output="sos"), held)
    return signal.sosfilt(signal.cheby2(20, 70, TOP_CUT_HZ, fs=SR, output="sos"), held[None])


dry = scene()
out = record(dry)
master(out)
```